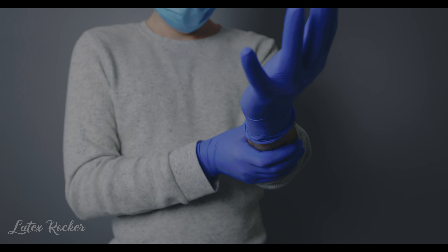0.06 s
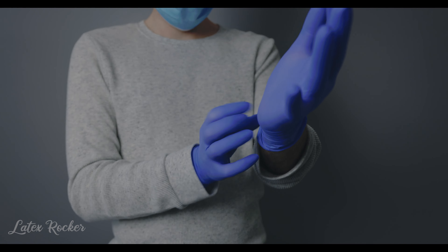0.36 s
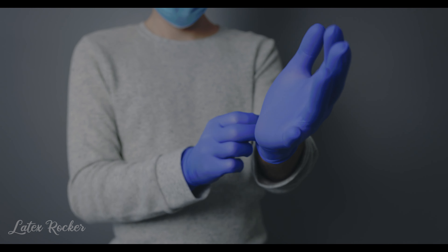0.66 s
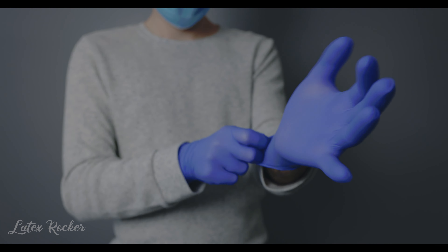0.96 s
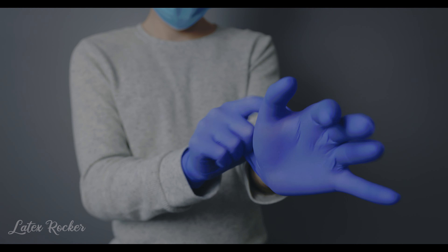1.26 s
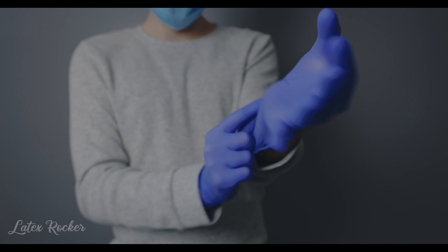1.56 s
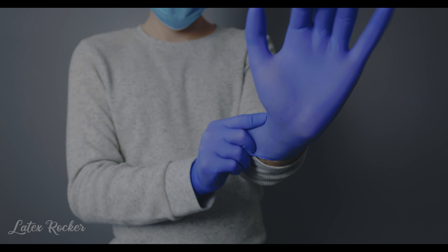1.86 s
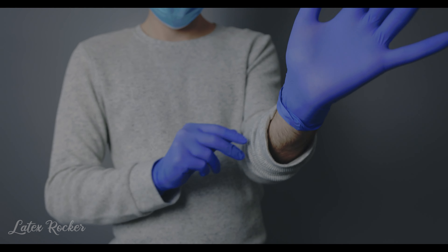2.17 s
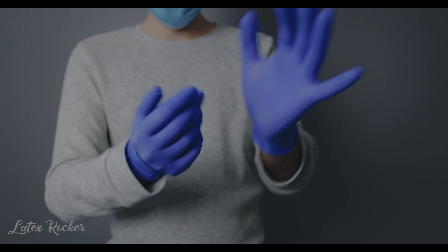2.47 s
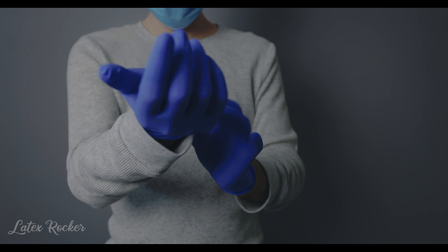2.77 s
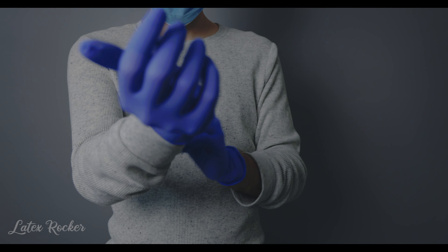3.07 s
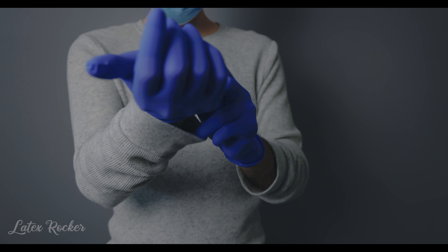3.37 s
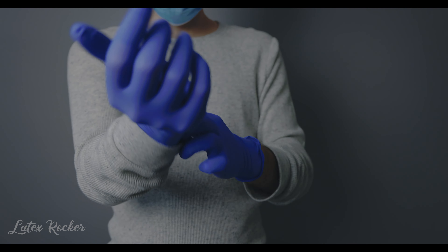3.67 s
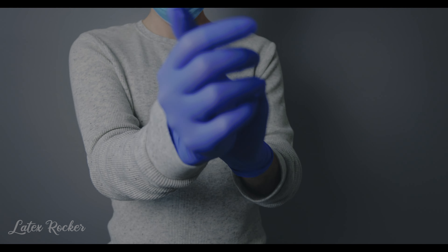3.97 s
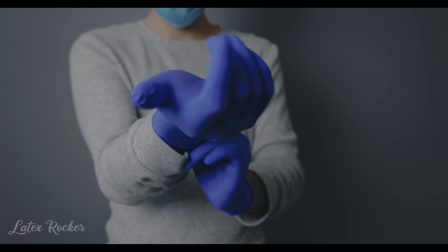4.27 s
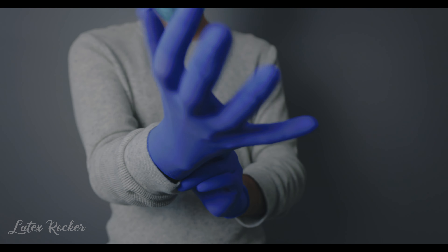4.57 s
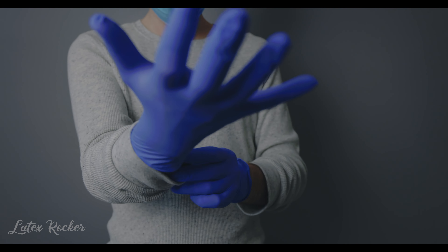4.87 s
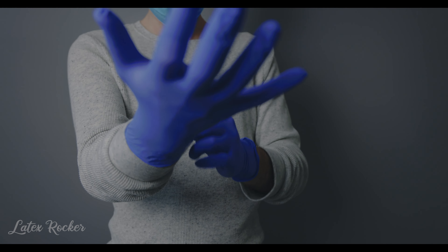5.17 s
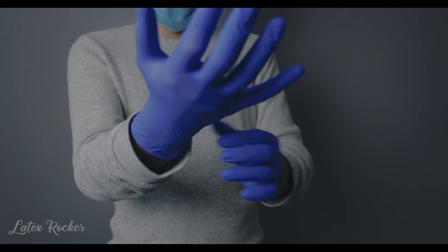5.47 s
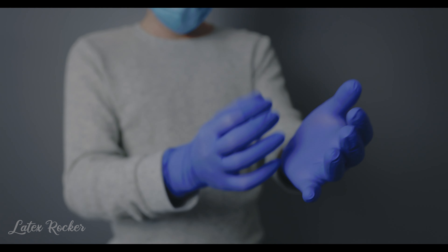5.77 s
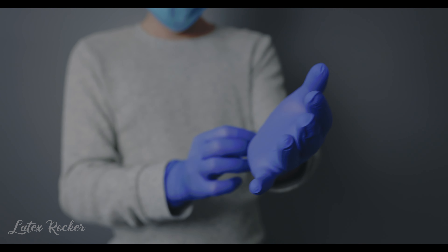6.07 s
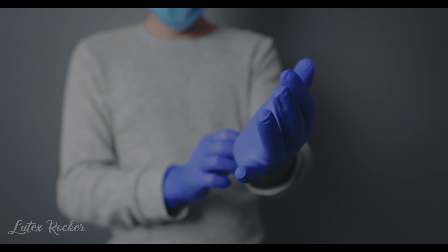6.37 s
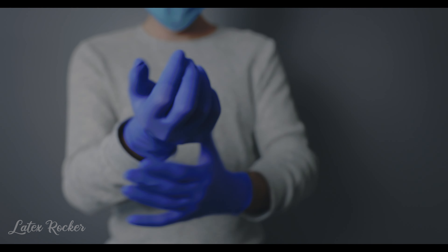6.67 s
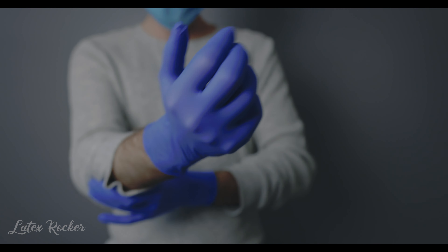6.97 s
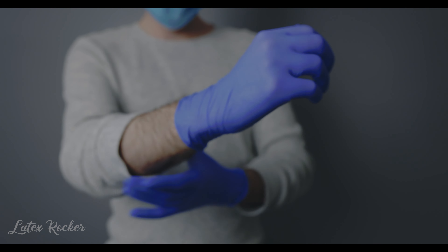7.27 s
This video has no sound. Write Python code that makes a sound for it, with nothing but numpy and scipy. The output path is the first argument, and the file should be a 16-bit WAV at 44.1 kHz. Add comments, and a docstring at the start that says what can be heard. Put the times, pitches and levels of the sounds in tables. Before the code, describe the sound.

In a quiet room, rubber gloves are tugged tight, snapped once on the wrist, then softly rubbed and adjusted.

```python
"""A stretched rubber cuff snaps hard on the wrist as thin gloves are pulled on in a small, quiet room.
The snap is a run of impacts that excite damped modes. Stick-slip friction of rubber on skin makes the
film rasp, flutter, swish, whine and creak; creases flick over and pockets of trapped air pop.
Moving arms push air and rustle their sleeves. Reflections follow the gloves, and behind them lie
a hush, two low room resonances and a faint far tone."""
import sys
import numpy as np
from scipy import signal
from scipy.io import wavfile
from scipy.ndimage import uniform_filter1d

SR = 44100
rng = np.random.default_rng(int(sys.argv[2]) if len(sys.argv) > 2 else 0)


def transcribe(signal):
    """Save signal, clipped to [-1, 1], as a 16-bit WAV file at the path in sys.argv[1]."""
    frames = np.atleast_2d(signal).T
    limited = np.clip(frames, -1, 1)
    pcm = np.round(limited * 32767).astype(np.int16)
    wavfile.write(sys.argv[1], SR, pcm)


N = 322812
TIME = np.arange(N) / SR


def gain_of(db):
    """Amplitude ratio of a level in decibels."""
    return 10 ** (np.asarray(db) / 20)


def unit_rms(x):
    """Normalisation to rms 1."""
    return x / np.sqrt(np.mean(x ** 2) + 1e-20)


def unit_peak(x):
    """Normalisation to peak 1."""
    return x / abs(x).max()


def value_at(points, hz):
    """Interpolation on a logarithmic frequency axis."""
    f, value = np.transpose(points)
    return np.interp(np.log(hz + 1), np.log(f + 1), value)


def add(mix, start_s, sound):
    """Superposition of a sound on the mix, in place."""
    part = mix[max(round(start_s * SR), 0):][:len(sound)]
    part += sound[:len(part)]


def colour(x, spectrum, size=4096):
    """Minimum-phase filtering: imposes a spectrum and keeps attacks sharp."""
    bin_hz = abs(np.fft.fftfreq(size, 1 / SR))
    log_gain = np.log(gain_of(value_at(spectrum, bin_hz)))
    response = np.exp(np.conj(signal.hilbert(log_gain)))
    taps = np.fft.ifft(response).real[:size // 2]
    return signal.oaconvolve(x, taps)[:len(x)]


def resonate(x, hz, width_hz):
    """Forced resonance of about unit gain, whose centre frequency may glide."""
    phasor = np.exp(2j * np.pi * np.cumsum(hz * np.ones(len(x))) / SR)
    pole = np.exp(-np.pi * width_hz / SR)
    return 2 * (phasor * signal.lfilter([1 - pole], [1, -pole], x / phasor)).real


def narrow_noise(hz, width_hz):
    """Narrow-band noise of rms 1: white noise through the same resonance twice."""
    once = resonate(rng.standard_normal(N), hz, width_hz)
    return unit_rms(resonate(once, hz, width_hz))


def damped_mode(hz, t60, sag=0., size=8192):
    """Free vibration: exponential decay, with a pitch that sags as the film loses tension."""
    t = np.arange(size) / SR
    fade = np.exp(-np.log(1000) * t / t60)
    pitch_hz = hz * (1 + sag * (fade - .5))
    return fade * np.sin(2 * np.pi * np.cumsum(pitch_hz) / SR)


def swell(rise_s, fall_s, curve=1.22):
    """Amplitude envelope from rest to 1 and back; a curve above 1 softens both ends."""
    t = np.arange(0, rise_s + fall_s, 1 / SR)
    angle = np.interp(t, [0, rise_s, rise_s + fall_s], [0, np.pi / 2, np.pi])
    return np.sin(angle) ** curve


# spectrum of the room's hush: (frequency [Hz], relative level [dB])
HUSH_SPECTRUM = [(12, -24.5), (20, 3), (104, -6.5), (158, -8), (228, -6.5), (410, -10), (542, -9),
                 (949, -14), (1150, -14), (1660, -16.5), (3070, -23.5), (3950, -23), (4300, -27),
                 (9950, -28), (16000, -32.5)]
# low resonances of the room air: (frequency [Hz], half-width of the resonator [Hz], level [dB])
ROOM_MODES = [(117.1, 6.4, -76), (220.7, 9.6, -73.5)]
def room_tone(hush_db=-63):
    """Ambient noise: a broadband hush, and room modes that drone under random excitation."""
    out = gain_of(hush_db) * unit_rms(colour(rng.standard_normal(N), HUSH_SPECTRUM, size=16384))
    for hz, half_width, db in ROOM_MODES:
        out += gain_of(db) * narrow_noise(hz, 2 * half_width)
    return out


# swells of the far tone: (start [s], rise [s], fall [s], level [dB], overtones re the tone [dB])
FAR_TONE_SWELLS = [(2.18, 0.07, 0.17, -63, -10), (2.39, 0.13, 0.27, -66, -1.5)]
# its overtones: (frequency [multiple of the tone], relative level [dB])
FAR_OVERTONES = [(2.05, 1.5), (2.85, -5.5)]
def far_tone(hz=425.5, width_hz=42):
    """Narrow bands of noise are heard as a faint, wavering tone that swells twice."""
    envelope, overtone_envelope = np.zeros((2, N))
    for start, rise, fall, db, overtones_db in FAR_TONE_SWELLS:
        add(envelope, start, gain_of(db) * swell(rise, fall))
        add(overtone_envelope, start, gain_of(db + overtones_db) * swell(rise, fall))
    out = envelope * narrow_noise(hz, width_hz)
    for multiple, db in FAR_OVERTONES:
        out += overtone_envelope * gain_of(db) * narrow_noise(multiple * hz, multiple * width_hz)
    return out


# reverberation time of the room: (frequency [Hz], T60 [s])
ROOM_T60 = [(100, 0.17), (400, 0.28), (1500, 0.36), (4000, 0.23), (8000, 0.22), (16000, 0.16)]
def reverberation(x, wet_db=-12, first_s=0.0048, near_db=3, near_s=0.0081):
    """Sparse reflections, strongest from the nearby body, decay at a rate that depends on frequency."""
    taps = rng.choice([-1., 1.], SR) * (rng.random(SR) < .1) * (TIME[:SR] > first_s)
    taps *= 1 + gain_of(near_db) * np.exp(-TIME[:SR] / near_s)
    hz, t, bands = signal.stft(taps, SR, nperseg=256)
    decay = np.exp(-np.log(1000) * t / value_at(ROOM_T60, hz)[:, None])
    tail = signal.istft(bands * decay, SR, nperseg=256)[1]
    return gain_of(wet_db) * signal.oaconvolve(x, tail / np.linalg.norm(tail))[:N]


# arm movements: (start [s], rise [s], fall [s], air level [dB], cloth level [dB])
ARM_MOVES = [(2.68, 0.1, 0.12, -66, -78), (4.96, 0.06, 0.51, -73, -67.5), (6.74, 0.16, 0.15, -58.5, -78)]
def arm_wafts(air_hz=27, air_width_hz=12, cloth_hz=250, cloth_width_hz=220):
    """Air displacement: a swinging arm sends out a slow pressure wave, and its sleeve rustles dully."""
    air, cloth = np.zeros((2, N))
    for start, rise, fall, air_db, cloth_db in ARM_MOVES:
        add(air, start, gain_of(air_db) * swell(rise, fall))
        add(cloth, start, gain_of(cloth_db) * swell(rise, fall))
    return air * narrow_noise(air_hz, air_width_hz) + cloth * narrow_noise(cloth_hz, cloth_width_hz)


# flexing fingers: (start [s], rise [s], fall [s], typical peak [dB], slip rate [1/s], frequency [Hz])
FINGER_CREAKS = [(2.648, 0.088, .08, -51, 170, 4600), (2.781, 0.045, 0.077, -49, 92, 3800),
                 (4.95, .02, 0.027, -39, 77, 6000), (5.53, 0.071, .14, -45, 85, 4700)]
def creaks(jitter=0.24, uneven_db=3, t60=0.00092, pitch_scatter=0.095, max_slips=64):
    """Nearly periodic stick-slip of rubber on rubber: each slip excites one very short ring."""
    out = np.zeros(N)
    draws = rng.standard_normal((len(FINGER_CREAKS), max_slips, 3))
    for (start, rise, fall, db, per_s, hz), chance in zip(FINGER_CREAKS, draws):
        effort = swell(rise, fall)
        times = np.cumsum(np.exp(jitter * chance[:, 0])) / per_s
        for s, (_, strength, detune) in zip(times, chance):
            if s * SR < len(effort):
                tick = unit_peak(damped_mode(hz * np.exp(pitch_scatter * detune), t60, size=512))
                add(out, start + s, gain_of(db + uneven_db * strength) * effort[int(s * SR)] * tick)
    return out


# light brushing on skin and sleeve between strokes: (time [s], level [dB])
LIGHT_CONTACT = [(0, -47.5), (.15, -56), (.5, -73.5), (.7, -63), (1.35, -62), (2.02, -57.5), (2.33, -75.5),
                 (2.85, -67.5), (3, -59.5), (3.35, -68.5), (3.7, -55.5), (4.85, -60.5), (5.1, -67.5),
                 (5.9, -69), (6.8, -69), (6.93, -60.5), (7.32, -68)]
# tugs and rubs: (start [s], rise [s], fall [s], level [dB], film pitch [Hz],
# relative flutter [dB], relative fizz [dB], tautness [factor on the film's resonance in dB])
HAND_STROKES = [ (0, 0.029, 0.035, -49, 4200, -21, 5, .9), (.05, 0.032, 0.067, -50, 4950, -10.5, 2, 0.54),
                (.25, 0.054, 0.097, -58.5, 2780, -10, -9, 0.95),
                (.728, 0.033, 0.033, -51, 3600, -8.5, -8, 0.3),
                (.87, 0.047, 0.18, -56.5, 2900, -12, -16, 0.62),
                (1.11, 0.067, 0.078, -50, 2200, -6.5, -16, 1), (1.24, 0.04, 0.092, -55, 2300, 1, -9, 0.41),
                (1.386, 0.031, 0.03, -48, 1850, 3.5, -27, 1.1),
                (1.42, 0.024, 0.19, -48.5, 2540, -2.5, -19, 0.71),
                (1.43, 0.092, 0.18, -56.5, 1250, -6, -27, 1.8),
                (1.526, 0.078, 0.073, -46.5, 2140, -6.5, -14, 1.7),
                (1.635, 0.028, 0.033, -42, 3200, -6.5, -15, 0.34),
                (1.715, 0.024, 0.075, -46.5, 2870, -4.5, -16, 0.1),
                (1.78, 0.098, 0.065, -46.5, 2360, -8.5, -15, 0.32),
                (2.029, 0.07, 0.016, -41, 4000, -12.5, -10.5, 0.19),
                (2.1, 0.065, 0.037, -47.5, 2800, -2.5, -7, .85),
                (2.97, 0.069, 0.16, -55, 2500, -4, -8, 0.28),
                (3.11, 0.07, 0.049, -52, 1880, -17, -16.5, 0.7),
                (3.2, 0.049, 0.037, -55.5, 4000, -15, -8, 0.55),
                (3.265, 0.025, 0.015, -53, 4540, -14, -1.5, 0.84),
                (3.44, 0.054, 0.041, -53, 3180, -16.5, -13, 0.35),
                (3.53, 0.14, 0.16, -52.5, 2390, -11, -11.5, 0.21),
                (3.769, 0.031, 0.068, -53, 1250, 6.5, -30, 1.1),
                (3.886, 0.019, 0.1, -42.5, 1740, -11, -19, 0.92),
                (3.96, 0.023, 0.16, -54.5, 1660, 2, -27, 1.4),
                (4.05, 0.096, 0.2, -48.5, 1630, -7, -25, 1.27),
                (4.21, 0.074, 0.067, -41, 1600, -1.5, -15.5, 0.68),
                (4.325, 0.018, 0.032, -47.5, 1140, 1, -22, 1.9),
                (4.419, 0.038, 0.11, -49, 1700, -13, -21, 0.62),
                (4.585, 0.073, 0.015, -46, 2560, -10, -15, 1.8),
                (4.7, 0.05, 0.051, -55.5, 2360, -19.5, -12, .9),
                (4.91, 0.07, 0.017, -57.5, 2400, -2, -13, 0.53),
                (5.03, 0.018, 0.022, -61.5, 1400, 6.5, -5, 0.27),
                (5.15, 0.032, .16, -63, 3600, -9.5, -12, 0.44),
                (5.46, 0.044, 0.032, -58.5, 2580, -8, -8, 0.84),
                (5.96, 0.048, 0.035, -60.5, 4700, -17, -0.5, 1.6),
                (6.04, 0.031, 0.022, -60, 4730, -19, -9, 0.76), (6.15, 0.034, .012, -60.5, 5460, -13, 0, 1),
                (6.24, 0.079, 0.034, -53.5, 3280, -9, -15, 0.28),
                (6.33, 0.035, 0.065, -52, 2920, -13, -11, 0.42),
                (6.51, 0.01, 0.05, -60.5, 2000, -6, -6, .5), (6.555, 0.018, 0.053, -65, 4800, -1.5, 5, .6),
                (6.94, 0.13, 0.097, -48, 2360, -10, -13, 0.72),
                (7.179, 0.066, 0.11, -60, 2404, -13, -11.5, 0.92)]
def hand_motion(contact_hz=2380, contact_flutter_db=-7, contact_fizz_db=-11.5, contact_taut=0.44,
                stretch_octaves=0.22):
    """Incoherent addition: the powers of strokes sum, and each sets the film's state by its share."""
    power = gain_of(np.interp(TIME, *np.transpose(LIGHT_CONTACT))) ** 2
    weighted = np.outer([np.log2(contact_hz), contact_flutter_db, contact_fizz_db, contact_taut], power)
    for start, rise, fall, db, hz, flutter_db, fizz_db, taut in HAND_STROKES:
        stroke_power = (gain_of(db) * swell(rise, fall)) ** 2
        octave = np.log2(hz) + stretch_octaves * np.linspace(-.5, .5, len(stroke_power))
        add(power, start, stroke_power)
        for control, value in zip(weighted, (octave, flutter_db, fizz_db, taut)):
            add(control, start, stroke_power * value)
    octave, flutter_db, fizz_db, taut = weighted / power
    return 10 * np.log10(power), 2 ** octave, flutter_db, fizz_db, taut


def friction(grip, slips_per_s=900, spread_db=3, clump_db=0.83):
    """Stick-slip force of rubber on skin: smooth sliding breaks into slips as grip goes from 0 to 1."""
    sizes = gain_of(spread_db * np.minimum(rng.exponential(1, N), 3))
    slips = unit_rms(sizes * rng.choice([-1, 1], N) * (rng.random(N) < slips_per_s / SR))
    force = np.sqrt(grip) * slips + np.sqrt(1 - grip) * rng.standard_normal(N)
    clumps = unit_rms(uniform_filter1d(rng.standard_normal(N), size=220))
    force *= gain_of(clump_db * clumps)
    return force / np.sqrt(uniform_filter1d(force ** 2, size=1024))


# broad resonance of the film: (frequency [multiple of its pitch], relative level [dB])
FILM_RESONANCE = [(.15, -13), (.4, -8.5), (.65, -4), (1, 0), (1.4, -2), (2, -6.5), (3.3, -12), (6, -17)]
# spectrum of rubber sliding on skin: (frequency [Hz], relative level [dB])
RUB_SPECTRUM = [(300, -24), (1000, -3), (2700, 0), (4700, 0), (7000, -7), (10000, -17), (16000, -30)]
def film_response(hz, film_hz, taut, fold_db=1.93):
    """Membrane gain (bins x frames): tension sharpens the resonance, and folds add passing peaks."""
    multiple, db = np.transpose(FILM_RESONANCE)
    hump_db = np.interp(np.log((hz[:, None] + 1) / film_hz), np.log(multiple), db)
    folds = uniform_filter1d(rng.standard_normal(hump_db.shape), size=3, axis=0)
    folds = unit_rms(uniform_filter1d(folds, size=10, axis=1))
    response = gain_of(taut * hump_db + value_at(RUB_SPECTRUM, hz)[:, None] + fold_db * folds)
    return response / np.sqrt(np.mean(response ** 2, axis=0))


# spectra of slack film and of its fine texture: (frequency [Hz], relative level [dB])
FLUTTER_SPECTRUM = [(80, -17), (180, -6), (300, -0.5), (450, 6.5), (700, 6.5), (1000, 10.5), (1600, -28.5),
                    (4000, -67.5)]
FIZZ_SPECTRUM = [(2500, -36), (6000, 9.5), (9000, 7.5), (12000, 3.5), (16000, -7)]
def rubbing(rasp_db=-1, flutter_trim_db=-2, slack_grip=.6, grip_per_db=.03):
    """Forced vibration: friction makes the film rasp, flutter where slack and fizz on its texture."""
    level_db, film_hz, flutter_db, fizz_db, taut = hand_motion()
    grip = np.clip(slack_grip + grip_per_db * flutter_db, 0, 1)  # slack film sticks, taut film slides
    force = friction(grip)
    hz, t, bands = signal.stft(force, SR, nperseg=256)
    response = film_response(hz, np.interp(t, TIME, film_hz), np.interp(t, TIME, taut))
    rasp = gain_of(rasp_db) * signal.istft(bands * response, SR, nperseg=256)[1][:N]
    flutter = gain_of(flutter_trim_db + flutter_db) * unit_rms(colour(force, FLUTTER_SPECTRUM))
    fizz = gain_of(fizz_db) * unit_rms(colour(force * rng.choice([-1, 1], N), FIZZ_SPECTRUM))
    return gain_of(level_db) * (rasp + flutter + fizz)


# slides of taut film: (start [s], rise [s], fall [s], level [dB], first pitch [Hz], last pitch [Hz])
TAUT_SLIDES = [(0, 0.022, 0.043, -40, 3900, 5700), (0.041, 0.024, 0.054, -43.5, 4760, 5400),
               (1.535, 0.057, 0.083, -41, 2650, 4160), (1.612, 0.051, 0.018, -43, 3900, 6200),
               (2.042, 0.042, 0.022, -38.5, 4270, 5170), (2.89, 0.048, .05, -63, 4960, 5800),
               (3.216, 0.031, 0.017, -57.5, 4830, 6250), (3.89, 0.026, 0.04, -41, 2500, 3570),
               (3.925, .025, 0.017, -44.5, 3260, 4460), (6.09, .03, .03, -60.5, 4930, 5600),
               (6.135, 0.027, .03, -59.5, 5030, 6000), (6.558, 0.0075, 0.027, -55.5, 5600, 6600)]
def swishes(relative_width=0.68, glide_curve=0.82):
    """Sliding noise drives a resonance of the taut film, whose frequency climbs with the stretch."""
    out = np.zeros(N)
    noises = rng.standard_normal((len(TAUT_SLIDES), SR))
    for (start, rise, fall, db, first_hz, last_hz), noise in zip(TAUT_SLIDES, noises):
        effort = swell(rise, fall)
        stretch = np.linspace(0, 1, len(effort)) ** glide_curve
        hz = first_hz * (last_hz / first_hz) ** stretch
        width_hz = relative_width * first_hz
        swish = resonate(resonate(noise[:len(effort)], hz, width_hz), hz, width_hz)
        add(out, start, gain_of(db) * effort * unit_rms(colour(swish, RUB_SPECTRUM)))
    return out


# tones of the fully stretched film: (frequency [Hz], peak level [dB])
WHINE_TONES = [(2316, -47), (2717, -41), (2916, -42)]
def whine(start_s=1.565, rise_s=0.041, fall_s=0.031, waver=.002, waver_hz=30):
    """Friction-induced oscillation: at full stretch the sliding film locks into a few thin tones."""
    effort = np.zeros(N)
    add(effort, start_s, swell(rise_s, fall_s))
    wavering_time = np.cumsum(1 + waver * narrow_noise(waver_hz, waver_hz)) / SR
    return effort * sum(gain_of(db) * np.sin(2 * np.pi * hz * wavering_time) for hz, db in WHINE_TONES)


# pockets of air under loose film: (time [s], level [dB], frequency [Hz], T60 [s])
AIR_POCKETS = [(.034, -43, 320, 0.052), (0.0601, -29.5, 380, 0.017), (0.101, -36.5, 440, 0.027),
               (1.281, -45.5, 328, 0.08), (1.326, -35, 455, 0.031), (1.39, -47, 574, 0.068),
               (1.407, -38.5, 570, 0.035), (1.417, -30.5, 750, 0.018), (1.667, -44.5, 455, 0.14),
               (1.75, -46.5, 506, 0.24), (2.07, -43.5, 407, 0.08), (2.097, -27.5, 483, 0.019),
               (2.103, -29.5, 343, 0.021), (3.029, -41, 290, 0.031), (3.992, -41, 435, 0.038),
               (4.004, -44, 390, 0.035), (4.289, -31.5, 776, 0.022), (4.336, -38, 720, 0.02),
               (4.341, -31.5, 800, 0.022), (4.636, -40, 418, 0.02), (4.652, -43, 495, 0.06),
               (4.983, -43.5, 486, 0.034), (6.33, -42, 460, 0.027), (6.5095, -44, 540, 0.025),
               (6.512, -43, 1140, 0.008), (6.512, -51, 346, 0.018)]
def pocket_pops(sag=0.23, flap_depth=.75, flap_hz=95, size=8192):
    """Damped membrane vibration: trapped air puffs out and the film thumps, flapping as it settles."""
    out = np.zeros(N)
    noises = rng.standard_normal((len(AIR_POCKETS), size))
    for (s, db, hz, t60), noise in zip(AIR_POCKETS, noises):
        flapping = 1 + flap_depth * unit_rms(resonate(noise, flap_hz, flap_hz))
        add(out, s, gain_of(db) * flapping / np.hypot(1, flap_depth) * damped_mode(hz, t60, sag, size))
    return out


# creases flicking over, a few followed by a bright echo about 5 ms later:
# (time [s], relative peak level [dB], frequency [Hz], relative treble [dB])
CREASES = [(0.0277, -34, 5000, 0), (0.0337, -30, 5600, -7), (0.0598, -33, 4500, -1),
           (0.101, -24.5, 3970, -3), (0.968, -41, 1900, -24), (1.321, -33, 2320, -6),
           (1.325, -34.5, 2490, -15), (1.419, -33.5, 2510, -26), (1.562, -41, 3500, -19),
           (1.730, -35, 5200, -11), (1.884, -33, 1200, -12), (2.096, -25.5, 1964, -7.5),
           (2.555, -46, 2200, -5.5), (3.009, -46, 1200, -26), (3.029, -33, 2260, -16),
           (3.183, -40, 1900, -29), (3.6723, -22.5, 2500, -18), (3.6741, -29, 2060, -30),
           (3.677, -33, 1750, 0), (3.912, -38, 1900, -25), (3.947, -38, 3400, -20), (4.091, -40, 1280, -23),
           (4.128, -44, 1500, -27), (4.161, -34.5, 1490, -25), (4.1965, -31, 1900, -25),
           (4.257, -30, 1970, -23), (4.267, -34, 2300, -20), (4.279, -34, 1880, -20),
           (4.303, -31.5, 1300, -25), (4.333, -28.5, 1960, -28), (4.460, -34.5, 1450, -24),
           (4.4654, -31.5, 1430, -29), (4.472, -33, 1510, -29), (4.4765, -34, 1600, -24),
           (4.481, -37, 1500, -22), (4.5441, -36, 1500, -21), (4.636, -34.5, 2120, -20),
           (4.652, -33, 2760, -17), (4.879, -34.5, 2720, -39), (4.939, -41.5, 1490, -7),
           (4.983, -43, 2250, -16), (5.049, -50, 1110, -16), (6.303, -42.5, 4600, -8),
           (6.359, -38.5, 3000, -9), (6.5091, -32, 6950, -5.5), (6.511, -37, 6500, -10),
           (6.514, -42, 2410, 6), (6.901, -43, 2970, -35)]
# spectrum of a flick: (frequency [Hz], relative level [dB])
FLICK_SPECTRUM = [(100, -6), (400, 5), (1500, 5), (4500, 0.5), (7000, -7), (16000, -27.5)]
def crease_flicks(gain_db=2.5, t60=0.0045, sag=0.75, ring_share=0.3, crumple_share=0.93,
                  crumple_s=0.0012, lead_in_s=.004, lead_in_end_db=-12, lead_in_rise_db=18,
                  delay_s=0.00132):
    """Sudden elastic release: a crease lets go with a click, a falling ring and a short crumple."""
    out = np.zeros(N)
    lead, size = round(lead_in_s * SR), 8192
    multiple, hump_db = np.transpose(FILM_RESONANCE)
    # a brief rising hiss softens the start of each click
    lead_in = gain_of(lead_in_end_db + lead_in_rise_db * np.linspace(-1, 0, lead))
    envelope = np.append(lead_in, np.exp(-TIME[:size] / crumple_s))
    for s, db, hz, treble_db in CREASES:
        crumple = envelope * rng.standard_normal(lead + size)
        release = signal.unit_impulse(size) + ring_share * damped_mode(hz, t60, sag)
        drive = np.pad(release, (lead, 0)) + crumple_share * crumple
        film = colour(drive, np.transpose([multiple * hz, hump_db]))
        body = unit_rms(colour(film, FLICK_SPECTRUM))
        edge = gain_of(treble_db) * unit_rms(colour(crumple, FIZZ_SPECTRUM))
        add(out, s + delay_s - lead_in_s, gain_of(db + gain_db) * unit_peak(body + edge))
    return out


CRACK_S = 2.1719  # the moment the cuff closes on the wrist
# spectrum the whole cuff sends into the room: (frequency [Hz], relative level [dB])
RADIATED_SPECTRUM = [(60, 2.5), (150, -11), (400, -2), (1300, -6), (2600, -3), (4400, -1.5), (6000, -10.5),
                     (8000, -18), (16000, -30)]
def cuff_radiation(energy_db=7, size=4096):
    """Radiation in all directions round the wrist gives the walls one even, broadband crack."""
    out = np.zeros(N)
    crack = colour(signal.unit_impulse(size), RADIATED_SPECTRUM)
    add(out, CRACK_S, gain_of(energy_db) * crack / np.linalg.norm(crack))
    return out


# the cuff lands in stages, edge first: (time [s], level [dB], frequency [Hz], T60 [s])
CUFF_IMPACTS = [(2.1634, -17.5, 4470, 0.0026), (2.1637, -20.5, 277, 0.021), (2.1637, -24.5, 80, 0.036),
                (2.1655, -17, 890, 0.007), (2.1657, -25, 2010, 0.004), (2.1695, -17.5, 5420, 0.0054),
                (2.1706, -11.5, 4650, 0.0075), (2.1719, -25, 437, 0.018), (2.1727, -19, 4840, 0.0034),
                (2.1727, -16.5, 2694, 0.009), (2.1733, -23.5, 1480, 0.0092)]
# modes of the taut band on the wrist: (frequency [Hz], relative level [dB], T60 [s])
BAND_MODES = [(1380, -15, .008), (2600, -6, .003), (4230, -7, .004), (5630, -21, .006)]
# spectrum of rubber striking skin: (frequency [Hz], relative level [dB])
IMPACT_SPECTRUM = [(60, -23.5), (160, -39.5), (400, 4.5), (1000, 6), (2500, 15), (4900, 8.5), (6200, -1),
                   (7500, -22), (11000, -20.5), (16000, -41)]
def cuff_snap(slap_s=2.1615, slap_rise_s=0.015, slap_t60=0.029, slap_db=-27, sag=0.11,
              band_db=-2, crack_peak_db=-1.5):
    """Impact excitation: the released cuff slaps down, cracks tight round the wrist and rings briefly."""
    closing = np.clip((TIME - slap_s) / slap_rise_s, 0, 1)
    dying = np.exp(-np.log(1000) * np.clip(TIME - slap_s - slap_rise_s, 0, 1) / slap_t60)
    slap = unit_rms(colour(rng.standard_normal(N), IMPACT_SPECTRUM))
    out = gain_of(slap_db) * closing * dying * slap
    for s, db, hz, t60 in CUFF_IMPACTS:
        add(out, s, gain_of(db) * damped_mode(hz, t60, sag))
    band = sum(gain_of(db + band_db) * damped_mode(hz, t60) for hz, db, t60 in BAND_MODES)
    crack = unit_peak(colour(signal.unit_impulse(len(band)), IMPACT_SPECTRUM))
    add(out, CRACK_S, gain_of(crack_peak_db) * unit_peak(crack + band))
    return out


def scene():
    """Superposition of direct sound, reflections and background in one channel."""
    gloves = rubbing() + swishes() + whine() + creaks() + crease_flicks() + pocket_pops()
    echoes = reverberation(gloves)
    echoes += reverberation(cuff_radiation(), wet_db=-14, first_s=.003, near_db=-7.5, near_s=.008)
    return (gloves + cuff_snap() + echoes + arm_wafts() + room_tone() + far_tone())[None]


def record(dry, cutoff_hz=15950):
    """Band limiting: a linear-phase low-pass filter removes the highest treble."""
    low_pass = signal.firwin(511, cutoff_hz, window=("kaiser", 9), fs=SR)
    return signal.oaconvolve(dry, low_pass[None], "same")


dry = scene()
out = record(dry)
transcribe(out)
```